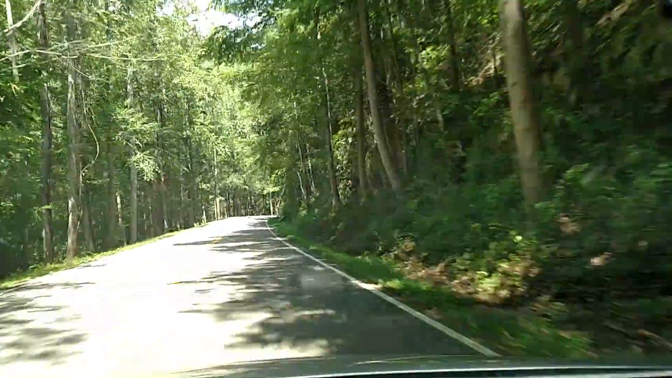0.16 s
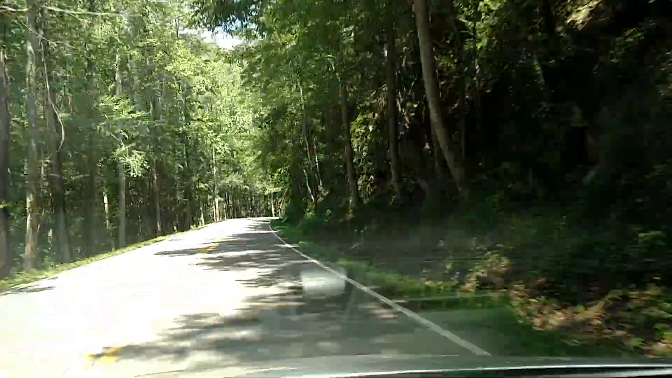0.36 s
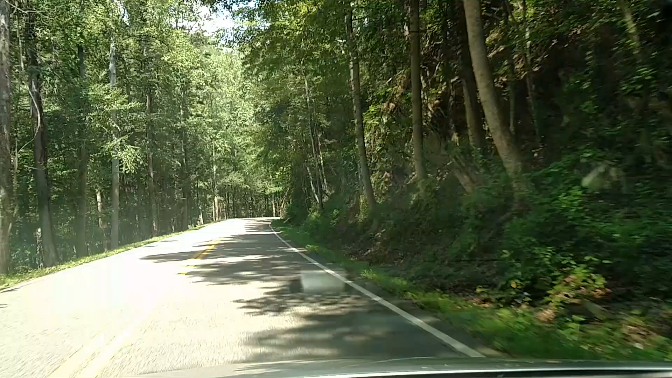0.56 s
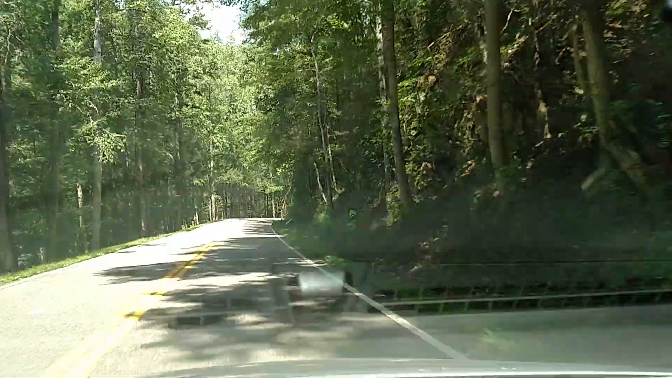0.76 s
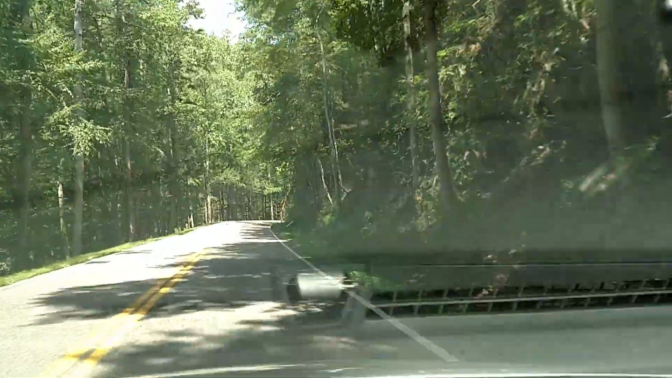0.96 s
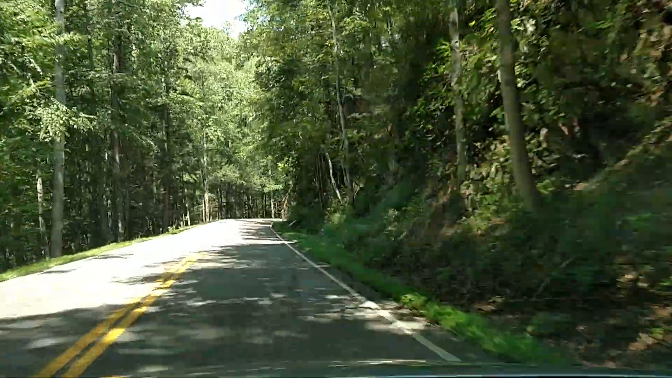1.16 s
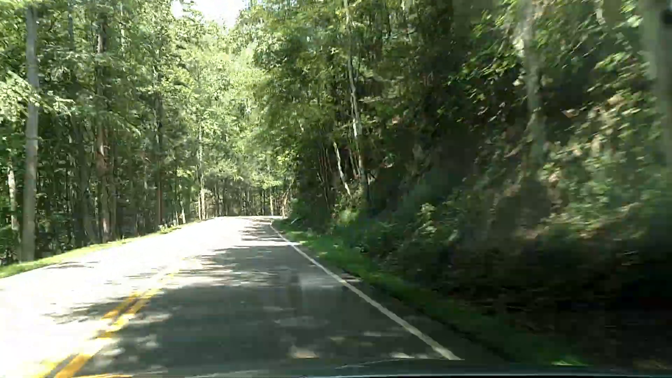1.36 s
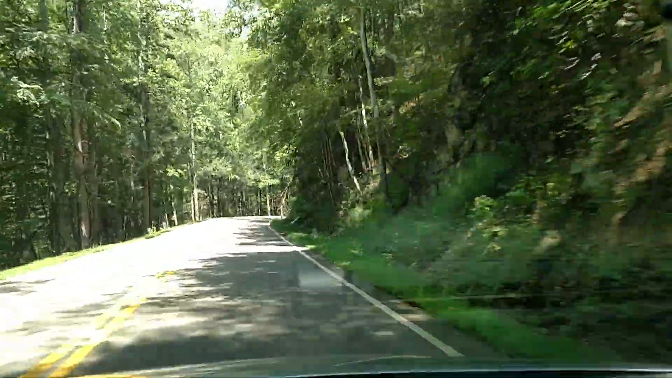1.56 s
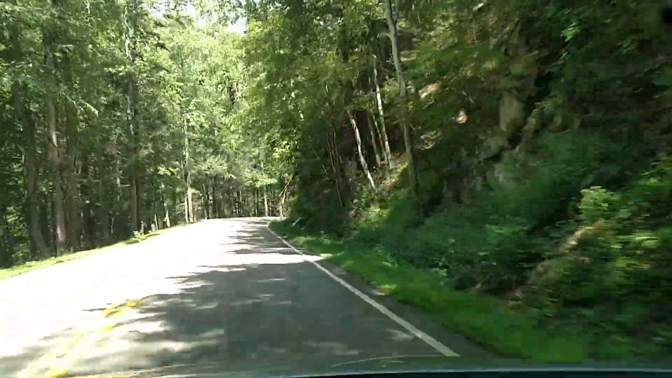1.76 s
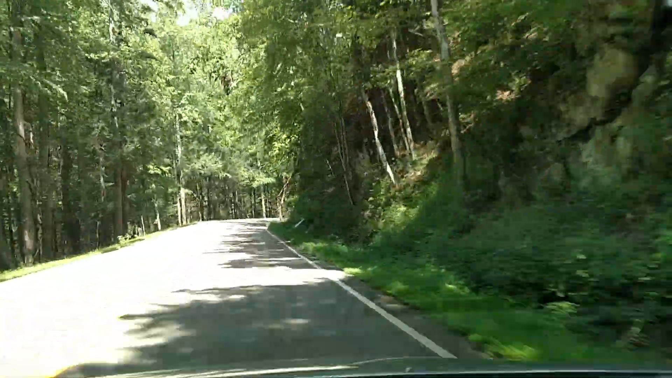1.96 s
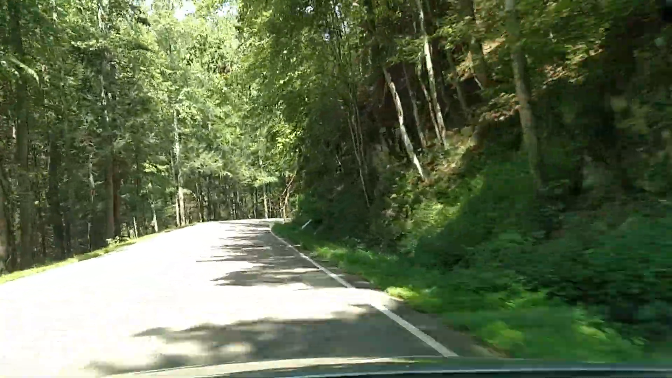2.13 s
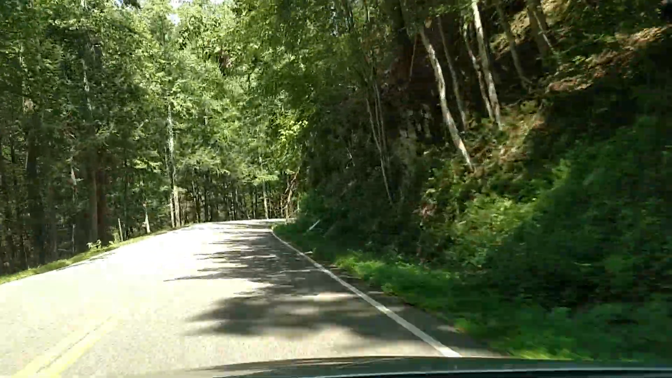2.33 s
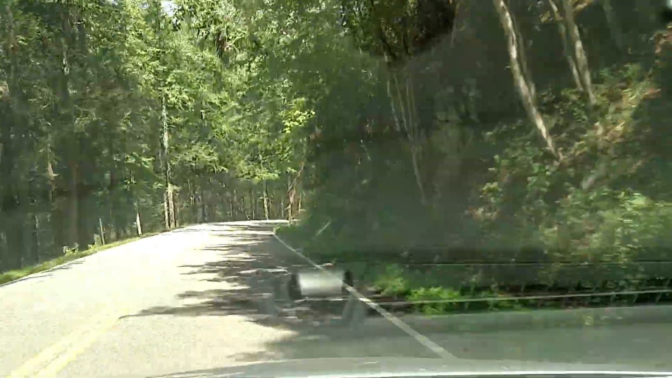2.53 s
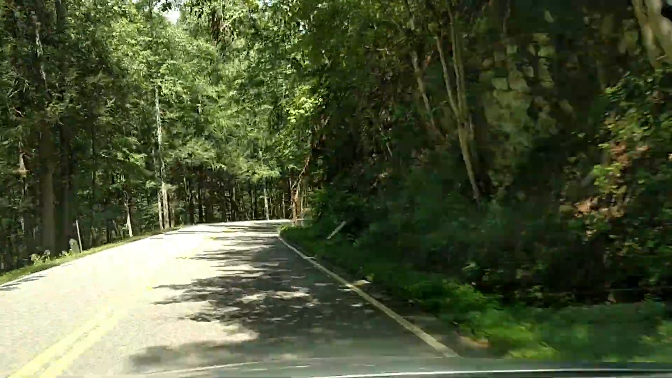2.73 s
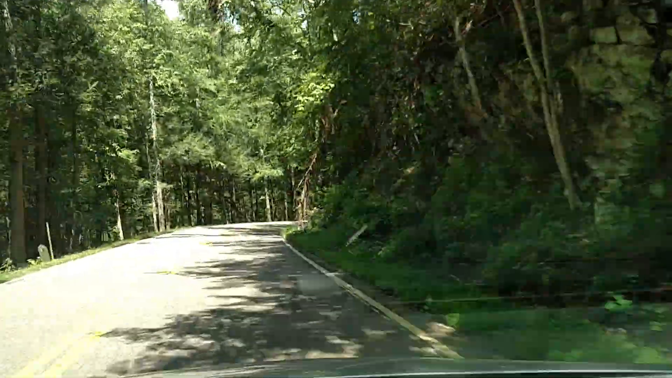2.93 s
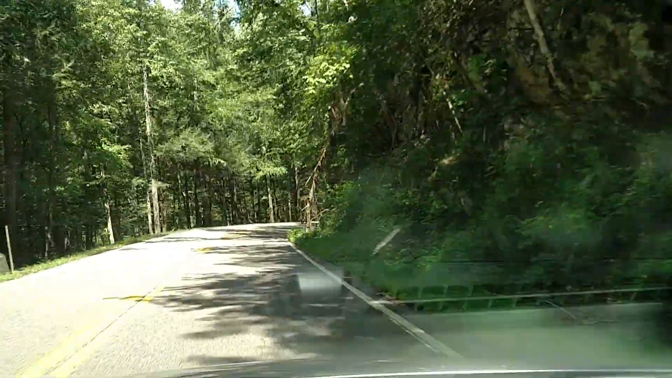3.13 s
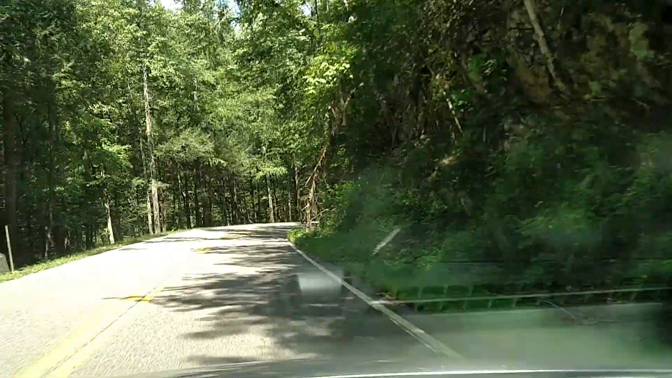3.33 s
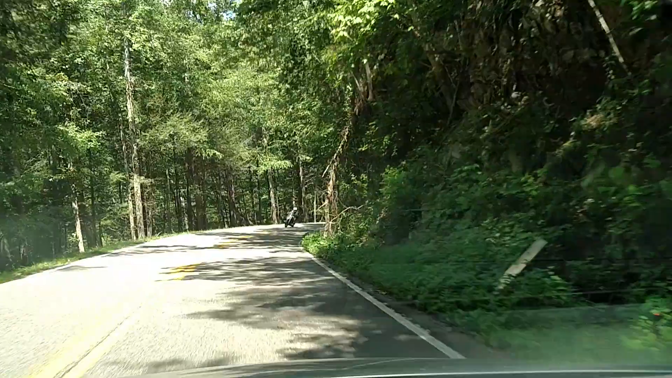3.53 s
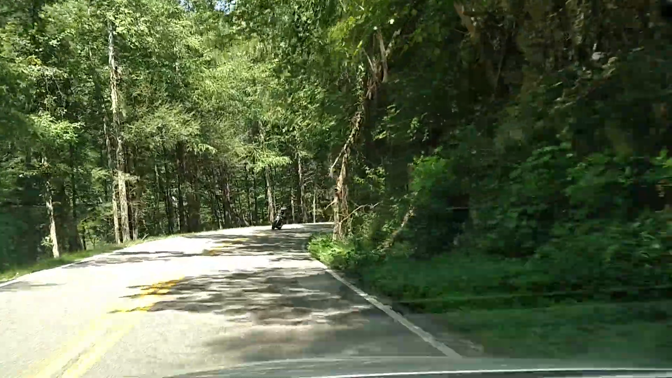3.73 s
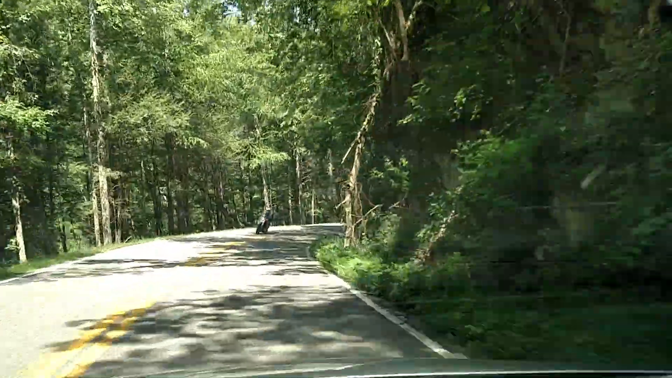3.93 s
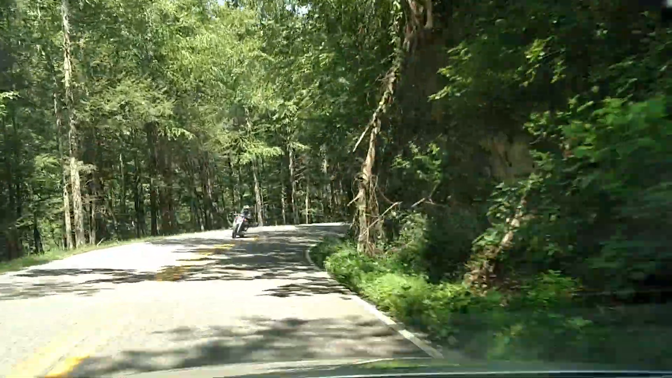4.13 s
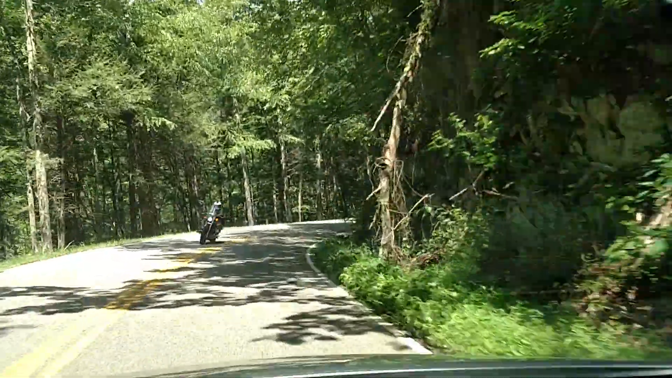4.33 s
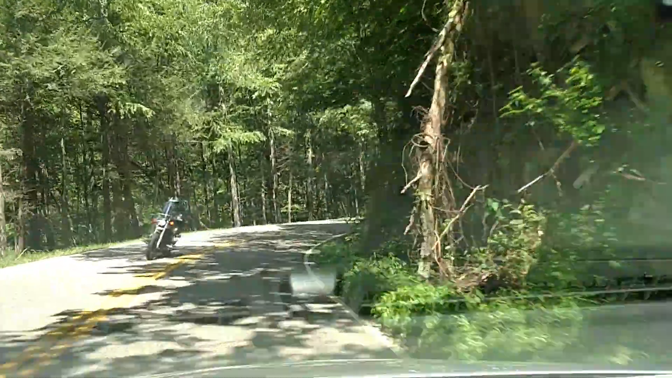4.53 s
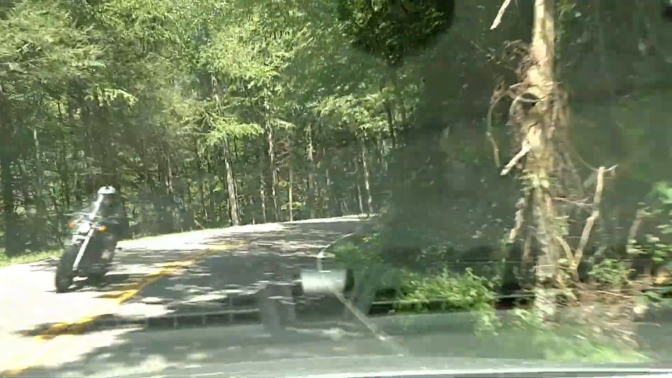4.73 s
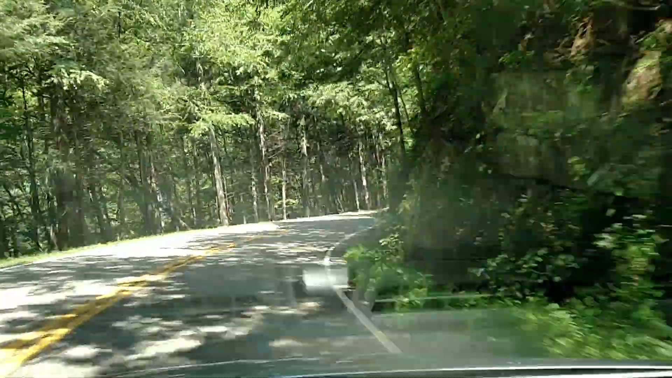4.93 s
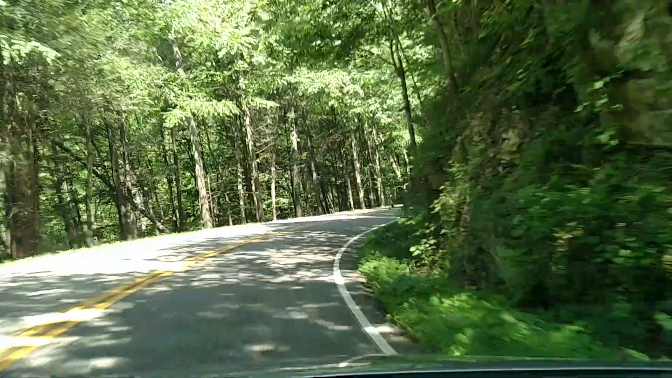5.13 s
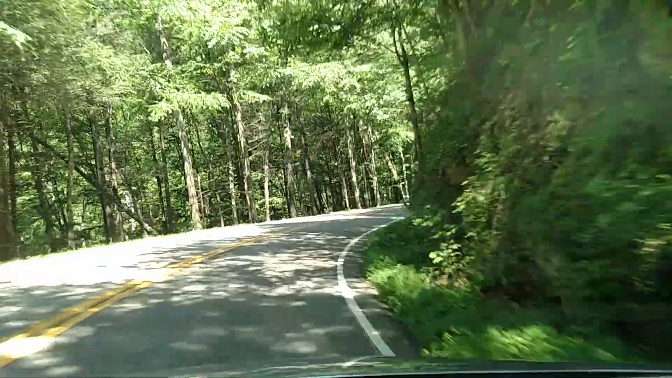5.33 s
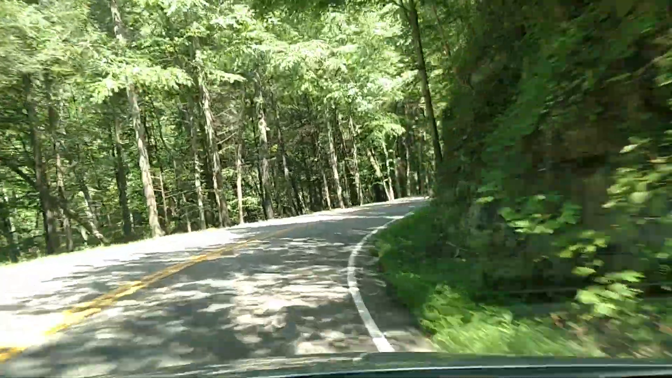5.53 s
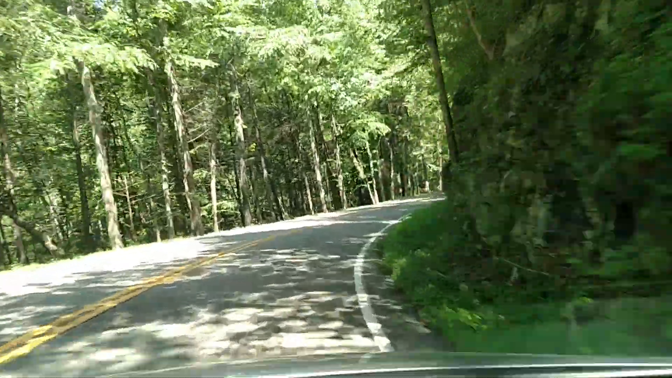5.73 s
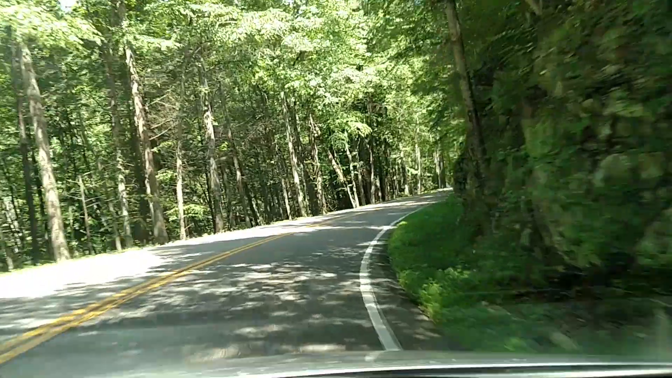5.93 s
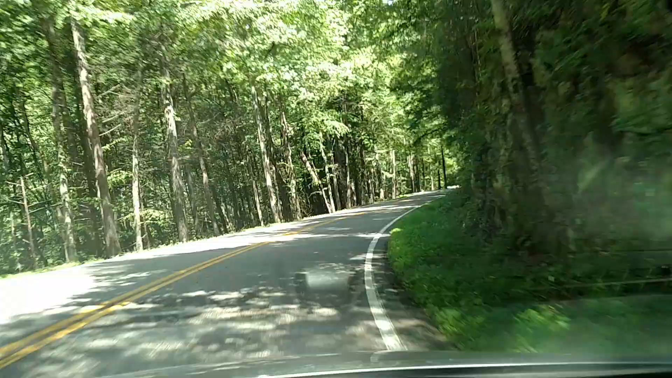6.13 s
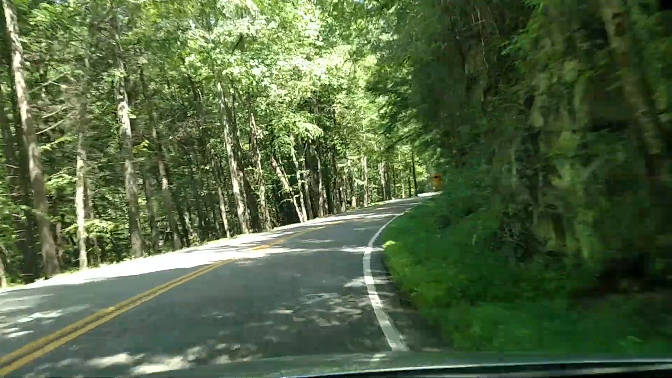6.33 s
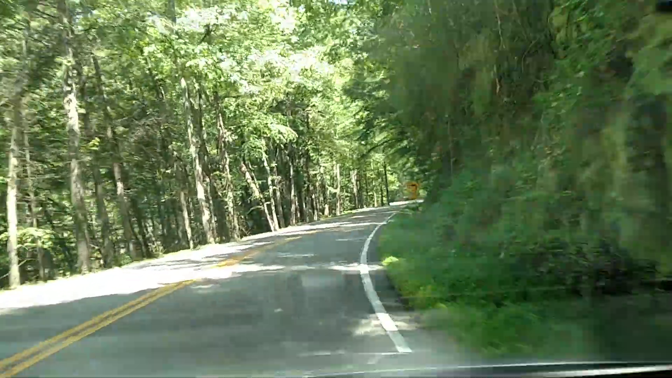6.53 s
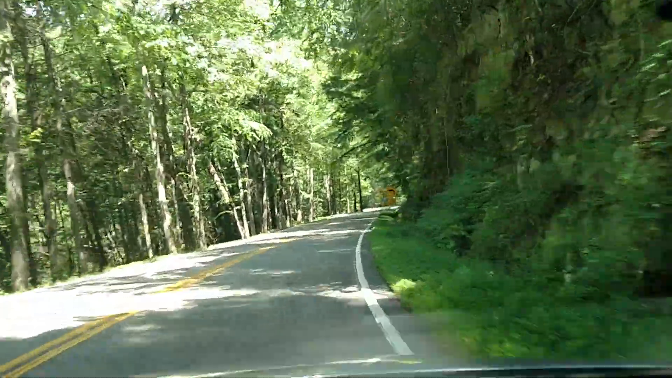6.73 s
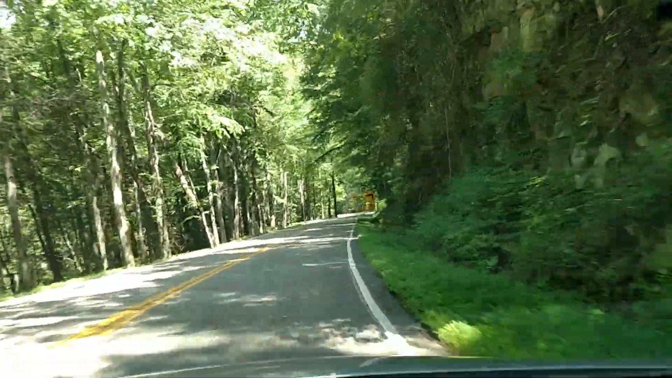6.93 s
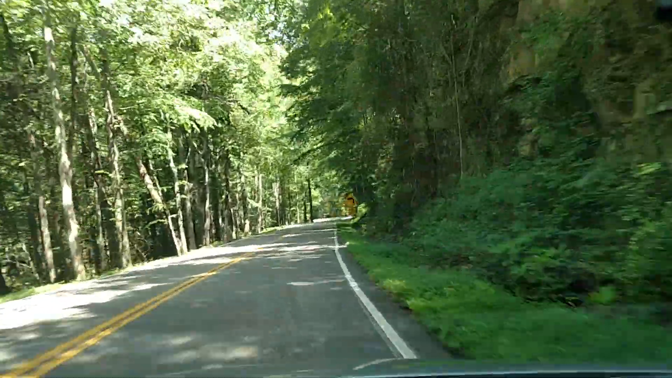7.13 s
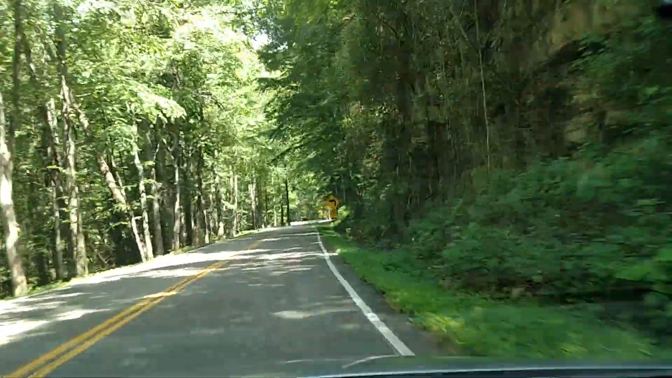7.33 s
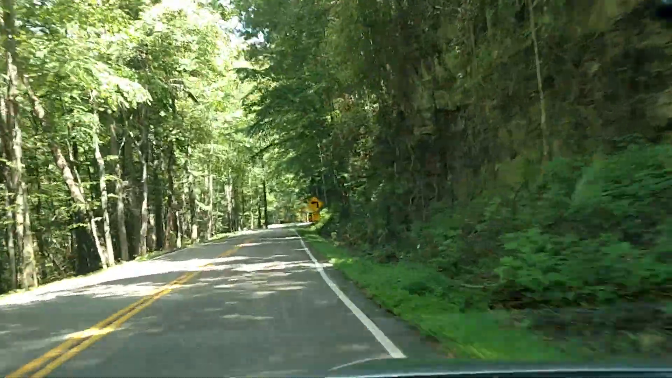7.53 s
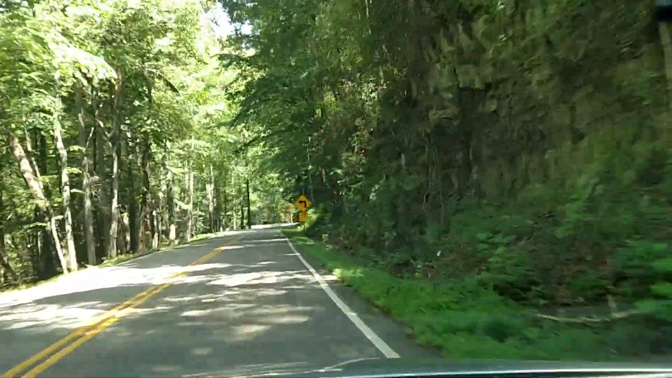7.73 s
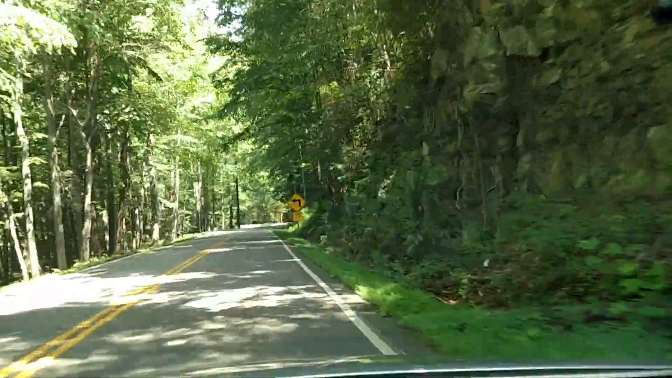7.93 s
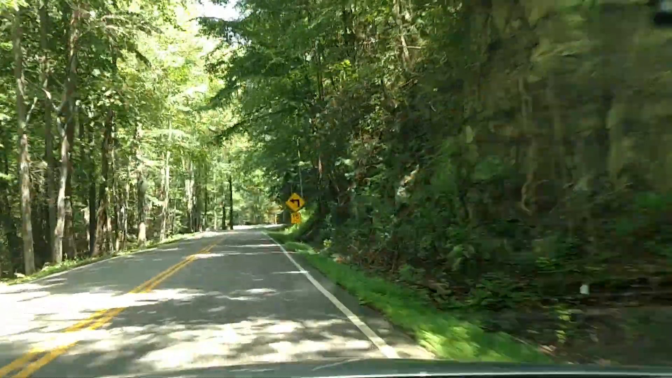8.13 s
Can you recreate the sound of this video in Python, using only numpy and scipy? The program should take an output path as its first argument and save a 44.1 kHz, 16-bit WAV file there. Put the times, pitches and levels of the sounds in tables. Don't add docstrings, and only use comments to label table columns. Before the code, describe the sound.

Heard from inside a moving car: a low engine hum, deep body rumble, tyre roar and faint wind hiss, with soft bumps. The engine note sags and fades, then an oncoming two-cylinder motorcycle swells, blasts past close by with crackling exhaust and a falling pitch, and vanishes within a second. The road noise, pushed down by the automatic level, recovers, joined by a faint drivetrain drone.

```python
import sys
import numpy as np
from scipy import signal
from scipy.io import wavfile
from scipy.ndimage import uniform_filter1d

SR = 44100
rng = np.random.default_rng(int(sys.argv[2]) if len(sys.argv) > 2 else 0)


def ratio_of_db(decibels):
    return 10 ** (np.asarray(decibels, float) / 20)


def unload_wav(signal):
    wavfile.write(
        sys.argv[1],
        SR,
        np.round(np.clip(np.atleast_2d(signal).T, -1, 1) * 32767).astype(np.int16),
    )


N = 360291
T = np.arange(N) / SR
PASS_S, CLOSING_M_S, ASIDE_M, SOUND_M_S = 5.14, 25, 1.0, 343


def motorcycle():
    shift, cycles = engine_cycles()
    heard = np.clip(np.minimum(T - 3.7, 6.0 - T) / 0.15, 0, 1)
    return heard * (hum(cycles) + exhaust(cycles, shift) + whoosh()) + cracks() + leaving_exhaust()


def engine_cycles():
    cycles_per_s, rev_up_per_s, rev_until_s, fires_at_s = 21.25, 1.2, 5.03, 5.195
    along = CLOSING_M_S * (PASS_S - T)
    shift = 1 + CLOSING_M_S / SOUND_M_S * along / np.hypot(along, ASIDE_M)
    rate = shift * (cycles_per_s + rev_up_per_s * np.minimum(T - rev_until_s, 0))
    cycles = np.cumsum(rate) / SR
    cycles -= np.interp(fires_at_s, T, cycles)
    return shift, cycles


def passing(db, ahead_m, blur_m, front, back):
    along = CLOSING_M_S * (PASS_S - T) - ahead_m
    return ratio_of_db(db - np.where(along > 0, front, back) * 10 * np.log10(1 + (along / blur_m) ** 2))


# f/Hz, width/Hz, level/dB
THUMP = [(174, 110, -1), (104.1, 25, -2)]
# f/Hz, width/Hz, level/dB
RING = [(347, 75, 1.5), (244, 65, -1.5), (424, 63, -3)]
# f/Hz, width/Hz, level/dB
BARK = [(680, 120, 6), (928, 72, 0.5), (1103, 78, -0.5), (1610, 130, -22.5)]


def exhaust(cycles, shift):
    second_cylinder = 0.42
    first = np.diff(np.floor(cycles), prepend=np.floor(cycles[0]))
    second = np.diff(np.floor(cycles - second_cylinder), prepend=np.floor(cycles[0] - second_cylinder))
    firings = (first + second) * ratio_of_db(1.3 * rng.standard_normal(N))

    puff_envelope = signal.lfilter([1], [1, -np.exp(-1 / (0.015 * SR))], firings)
    puff = evened(puff_envelope * rng.standard_normal(N))
    firings = evened(firings)

    blow = np.convolve(firings + 0.2 * puff, np.hanning(130), "same")
    push = np.convolve(firings + 0.89 * puff, np.hanning(70), "same")
    thump = -evened(resonate(blow, THUMP))
    ring = evened(glide(push, RING, 0.985 * shift))
    bark = evened(resonate(firings + 1.4 * puff, BARK))

    shade_db = -7 * step(at_s=5.236, over_s=0.0068)
    gone_db = -17.5 * step(at_s=5.385, over_s=0.012)
    tailpipe = passing(db=3, ahead_m=-1.13, blur_m=2, front=2.5, back=1.3) * thump
    silencer = passing(db=-0.5, ahead_m=-0.14, blur_m=2.5, front=2.5, back=1.66) * ring
    pipe_mouth = passing(db=-17, ahead_m=-1.0, blur_m=1.2, front=1.8, back=1.7) * bark
    return ratio_of_db(shade_db) * tailpipe + ratio_of_db(gone_db) * (silencer + pipe_mouth)


# multiple of the cycle rate, level/dB
BOOM_ORDERS = [(4, -15), (5, -13), (6, 0), (7, -10), (8, -22), (11, -28), (15, -27)]
# multiple of the cycle rate, level/dB
UPPER_ORDERS = [(17, -2.5)]


def hum(cycles):
    uneven_db = 1.8 * drift(1500)
    throttle_db = -12.5 * (1 - step(at_s=4.31, over_s=0.12))
    intake = passing(db=2.2, ahead_m=1.9, blur_m=2.0, front=0.99, back=3.6)
    boom = intake * ratio_of_db(throttle_db + uneven_db) * orders(cycles, BOOM_ORDERS)
    sing_db, sing_s, rise_db_per_s, fall_db_per_s = -27, 4.77, 16, 138.5
    sing_db = sing_db - np.maximum(rise_db_per_s * (sing_s - T), fall_db_per_s * (T - sing_s))
    return boom + ratio_of_db(sing_db - uneven_db) * orders(cycles, UPPER_ORDERS)


def orders(cycles, table):
    out = np.zeros(N)
    for k, db in table:
        order = round(k)
        out += ratio_of_db(db) * np.cos(2 * np.pi * (order * cycles - order % 2 / 4))
    return np.sqrt(2) * out


# f/Hz, width/Hz, level/dB
CRACK = [(3640, 860, 1), (5530, 4000, -6), (7100, 790, 2.5), (8880, 4700, -13), (13000, 3900, -25.5)]
# t/s, peak level/dB, loudest band f/Hz, t60/s
CRACKS = [(5.016, -52, 6000, .05), (5.059, -45, 6500, .08), (5.1014, -39, 5500, .08),
          (5.125, -48, 8000, .04), (5.1468, -32, 6000, .03), (5.168, -36, 7000, .03),
          (5.1962, -29, 3750, .03), (5.2166, -27, 6900, .025), (5.247, -45, 7000, .04),
          (5.266, -43, 5800, .06), (5.297, -52, 4500, .05), (5.3169, -41, 5400, .045)]


def cracks():
    out = np.zeros(N)
    t = T[:4000]
    for s, db, hz, t60 in CRACKS:
        envelope = ratio_of_db(-60 * t / t60) * np.minimum(t / 0.00044, 1)
        burst = envelope * rng.standard_normal(len(t))
        burst = resonate(burst, CRACK) + resonate(burst, [(hz, 800, 7)])
        out[round(s * SR):][:len(t)] += ratio_of_db(db + 9.5) * burst / abs(burst).max()
    return out


# f/Hz, level/dB per Hz
WHOOSH = [(500, -11.5), (900, -9.5), (2000, -5.5), (3000, -13.5), (5000, -17.5), (7000, -17.5),
          (9000, -30.5), (15000, -44.5)]


def whoosh():
    tyres = passing(db=-35, ahead_m=0.2, blur_m=0.6, front=1.05, back=1.3)
    return tyres * noise(WHOOSH, size=256, patchy_db=1.0, flicker_db=3.0)


# t/s, f/Hz, level/dB
LEAVING = [
    (5.47, 231.5, -21.5),
    (5.57, 220, -25),
    (5.7, 207, -23),
    (5.8, 200, -28),
]


def leaving_exhaust():
    return tone(LEAVING, waver_db=2.9, second_db=-35)


# t/s, f/Hz, level/dB
NOTE = [
    (0, 110.6, -13),
    (.25, 107.9, -17),
    (.9, 108.4, -13.5),
    (1.6, 107.5, -19.5),
    (2.0, 106.8, -18.5),
    (2.4, 105.8, -24),
    (2.8, 100.2, -23),
    (3.2, 98.6, -20.5),
    (3.6, 97, -31),
]
# t/s, f/Hz, level/dB
DRONE = [
    (6.4, 183.6, -39),
    (6.9, 186.6, -26.5),
    (7.5, 185.8, -29),
    (8.17, 190, -36),
]


def car_engine():
    return tone(NOTE, waver_db=0.92, second_db=-22.5) + tone(DRONE, waver_db=1.9, second_db=-33.5)


def tone(rows, waver_db, second_db):
    hz, db = curves(rows)
    turn = 2 * np.pi * np.cumsum(hz) / SR
    fade_in = np.clip((T - rows[0][0] + 0.2) / 0.23, 0, 1)
    fade_out = np.clip((rows[-1][0] + 0.16 - T) / 0.14, 0, 1)
    level = fade_in * fade_out * ratio_of_db(db + waver_db * drift(3000))
    return np.sqrt(2) * level * (np.sin(turn) + ratio_of_db(second_db) * np.sin(2 * turn))


# f/Hz, level/dB per Hz
SHAKE = [(7.1, -34), (12, 2.5), (38, 0), (49, -1), (70, -9), (75, -10), (90, -7.5), (120, -38), (200, -120)]
# f/Hz, level/dB per Hz
BOOM = [(41, -43), (70, -9), (90, -10.5), (107, 0.5), (140, -6.5), (156, -9), (193, -6.5), (280, -15),
        (312, -15.5), (365, -20.5), (450, -29.5), (580, -59.5), (990, -120)]
# f/Hz, level/dB per Hz
ROAR = [(210, -29.5), (350, -1.5), (373, -0.5), (435, -8.5), (526, -4), (642, -13.5), (756, -14),
        (805, -15), (1200, -16.5), (1500, -27.5), (1660, -28), (2370, -42.5), (3050, -44), (3960, -77),
        (6710, -120)]
# f/Hz, level/dB per Hz
HISS = [(1300, -10), (1800, -1.5), (2500, -8), (3000, -14.5), (3600, -13), (4300, -16.5), (5700, -19.5),
        (6500, -19.5), (7700, -23.5), (8500, -28.5), (10500, -34), (13000, -39.5), (16000, -43.5)]
# f/Hz, width/Hz, level/dB
SEAL = [(7100, 1900, -76.5), (9200, 900, -85.5)]
# t/s, rush of air and tread level/dB, load on the springs level/dB
DRIVE = [(0.05, 2.5, -9), (0.35, -2.5, 1.5), (0.65, 1, 0.5), (1.0, -1, -1), (1.5, 3.5, 0),
         (1.85, -3.5, 1.5), (2.45, 1, 0.5), (2.8, 1, -0.5), (3.95, 0.5, 1.5), (4.35, 2.5, 0), (5.6, 9.5, 1),
         (5.97, 6.5, -3), (6.3, 7.5, -1.5), (6.7, 8.5, 1), (7.12, 8.5, -1.5), (7.28, 5, -5),
         (7.85, 3, -3.5), (8.15, 2.5, 0.5)]


def road():
    rush_db, load_db = curves(DRIVE)
    boom_db = -20.5 - 0.13 * load_db + 0.19 * bumps()
    scrub_db = 3 * np.exp(-((T - 7.06) / 0.4) ** 2)
    roar_db = -34 + 0.3 * rush_db + scrub_db
    shake = ratio_of_db(-20 + load_db) * noise(SHAKE, size=8192, patchy_db=-1.0, flicker_db=1.23)
    boom = ratio_of_db(boom_db) * noise(BOOM, size=4096, patchy_db=2.0, flicker_db=0.2)
    roar = ratio_of_db(roar_db) * noise(ROAR, size=1024, patchy_db=1.43, flicker_db=0.13)
    hiss = ratio_of_db(-60.5 + rush_db) * noise(HISS, size=256, patchy_db=-0.4, flicker_db=0.7)
    seal = 3.3 * resonate(rng.standard_normal(N), SEAL)
    return shake + boom + roar + hiss + seal


# t/s, level above smooth road/dB, length/s, cabin air f/Hz
BUMPS = [(1.255, 11, 0.27, 138), (1.603, 13, 0.12, 138), (2.505, 5, .25, 128), (3.502, 9, 0.21, 124),
         (3.903, 16.5, 0.19, 126), (5.498, 16, 0.48, 125), (6.102, 12, 0.45, 120), (6.755, 16, .18, 125),
         (7.353, 10.5, 0.19, 134), (7.595, 10.5, 0.15, 125), (8.003, 7, .25, 122)]


def bumps():
    return sum(db * np.exp(-((T - s) / length) ** 2) for s, db, length, hz in BUMPS)


def cabin():
    hz = curves(BUMPS)[-1]
    a, b = rng.standard_normal((2, N))
    slow = signal.sosfilt(signal.butter(2, 14.0, fs=SR, output="sos"), a + 1j * b)
    carrier = np.exp(2j * np.pi * np.cumsum(hz) / SR)
    return ratio_of_db(-34.5 + bumps()) * evened((slow * carrier).real)


def noise(spectrum, size, patchy_db, flicker_db):
    hop = size // 4
    frames, hz = N // hop + 5, np.fft.rfftfreq(size, 1 / SR)
    a, b, patches = rng.standard_normal((frames, len(hz), 3)).T
    patches = evened(uniform_filter1d(uniform_filter1d(patches, size=9, axis=0), size=5, axis=1))
    gusts = evened(uniform_filter1d(rng.standard_normal(frames), size=3))
    f, db = np.transpose(spectrum)
    colour_db = np.interp(np.log(hz + 1), np.log(f + 1), db, left=-120, right=-120)
    z = (a + 1j * b) * ratio_of_db(colour_db[:, None] + patchy_db * patches + flicker_db * gusts)
    return evened(signal.istft(z, nperseg=size, noverlap=size - hop)[1][:N])


def resonate(x, modes):
    out = np.zeros(len(x))
    for k, (hz, width, db) in enumerate(modes):
        r = np.exp(-np.pi * width / SR)
        pole = r * np.exp(2j * np.pi * hz / SR)
        mode = signal.lfilter([(1 - r) ** 2], [1, -2 * pole, pole ** 2], x).real
        out += (-1) ** k * ratio_of_db(db) * 2 * mode
    return out


def glide(x, modes, shift):
    out = np.zeros(len(x))
    for k, (hz, width, db) in enumerate(modes):
        r = np.exp(-np.pi * width / SR)
        turn = np.exp(2j * np.pi * hz * np.cumsum(shift) / SR)
        envelope = signal.lfilter([(1 - r) ** 2], [1, -2 * r, r * r], x / turn)
        out += (-1) ** k * ratio_of_db(db) * 2 * (turn * envelope).real
    return out


def evened(x):
    return x / np.sqrt(np.mean(x ** 2) + 1e-20)


def drift(size):
    return evened(uniform_filter1d(uniform_filter1d(rng.standard_normal(N), size=size), size=size))


def step(at_s, over_s):
    return (1 + np.tanh((T - at_s) / over_s)) / 2


def curves(rows):
    s, *columns = np.transpose(rows)
    return [np.interp(T, s, c) for c in columns]


def scene():
    return (motorcycle() + car_engine() + road() + cabin())[None]


def roll_off(x):
    return signal.sosfilt(signal.butter(12, 15520, fs=SR, output="sos"), x)


def record(dry):
    duck_from_s, duck_full_s, hold_until_s, back_s = 4.59, 5.14, 5.593, 6.19
    attack = (T - duck_from_s) / (duck_full_s - duck_from_s)
    recovery = (back_s - T) / (back_s - hold_until_s)
    duck_db = -11.5 * np.clip(np.minimum(attack, recovery), 0, 1)
    ducked = dry * ratio_of_db(duck_db) + ratio_of_db(-77.0) * rng.standard_normal(N)
    held = ducked / (1 + abs(ducked) ** 16) ** (1 / 16)
    return roll_off(held)


dry = scene()
out = record(dry)
unload_wav(out)
```